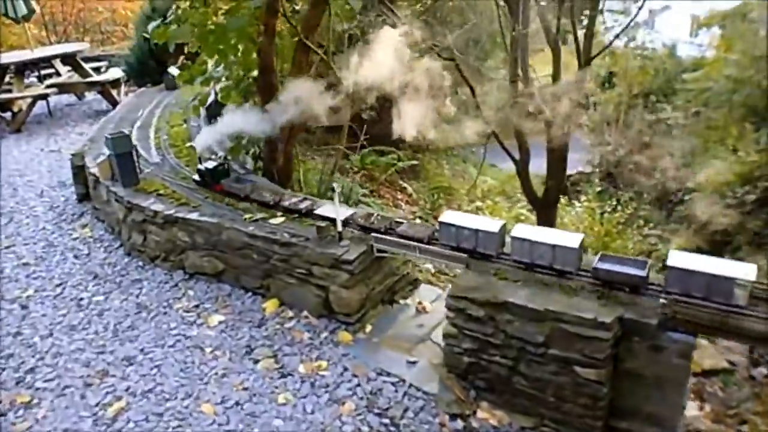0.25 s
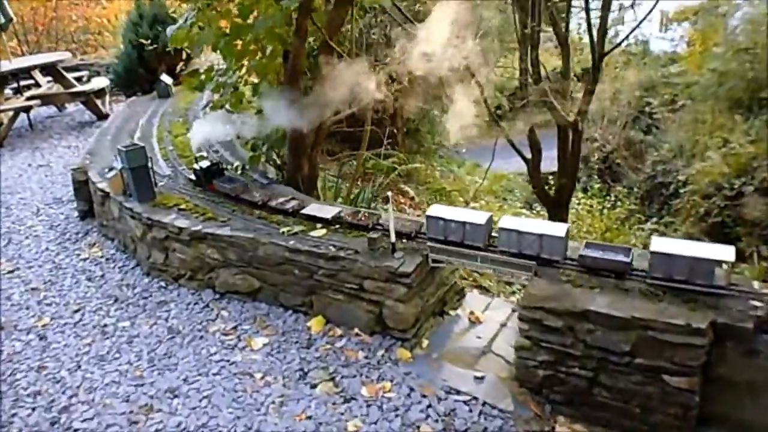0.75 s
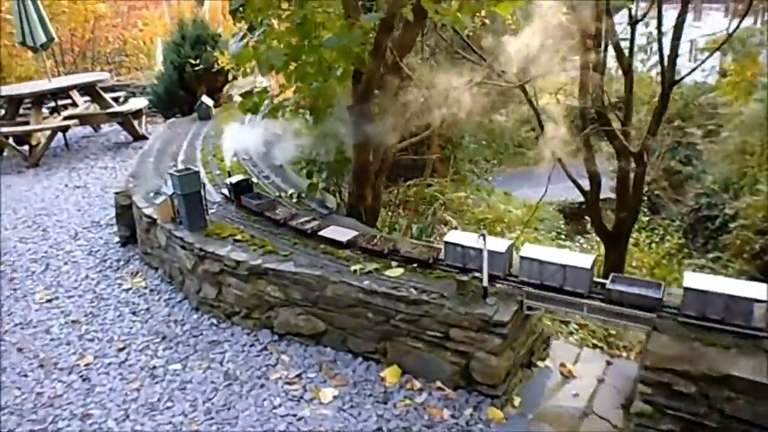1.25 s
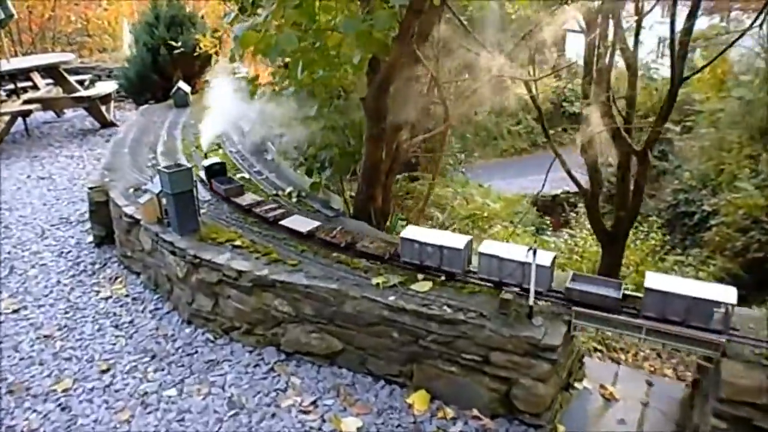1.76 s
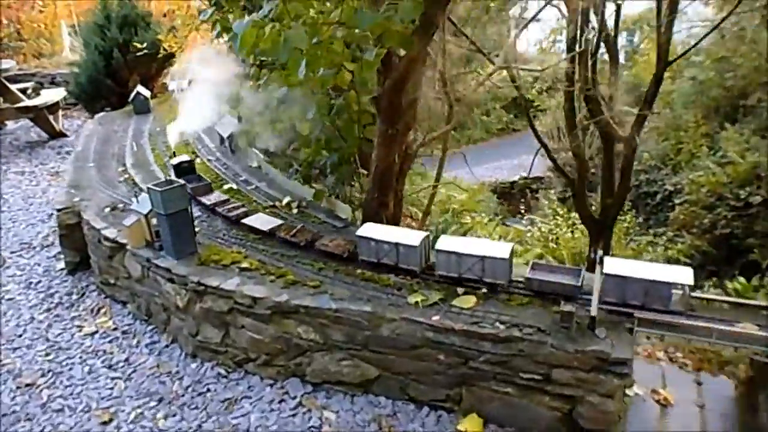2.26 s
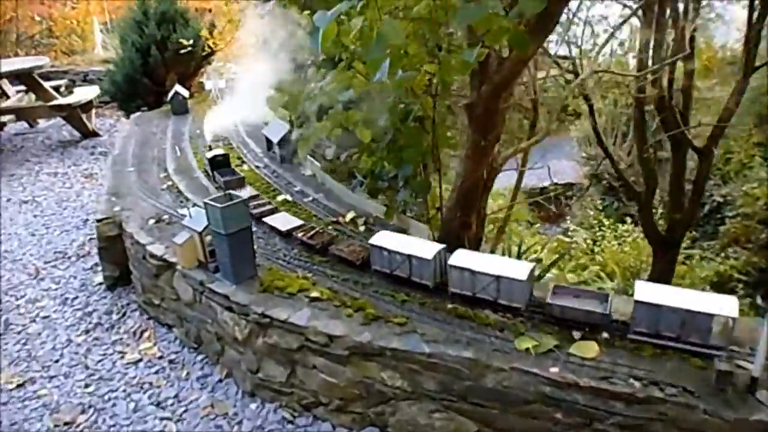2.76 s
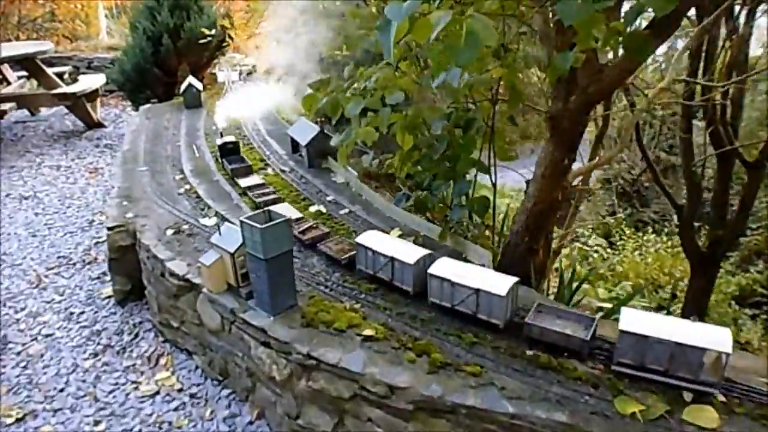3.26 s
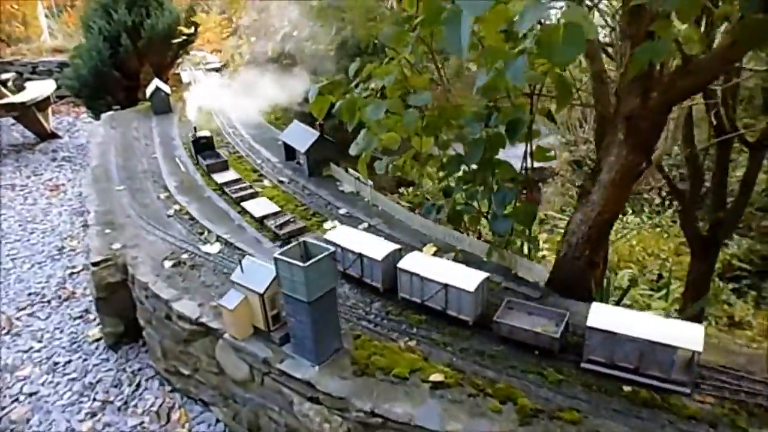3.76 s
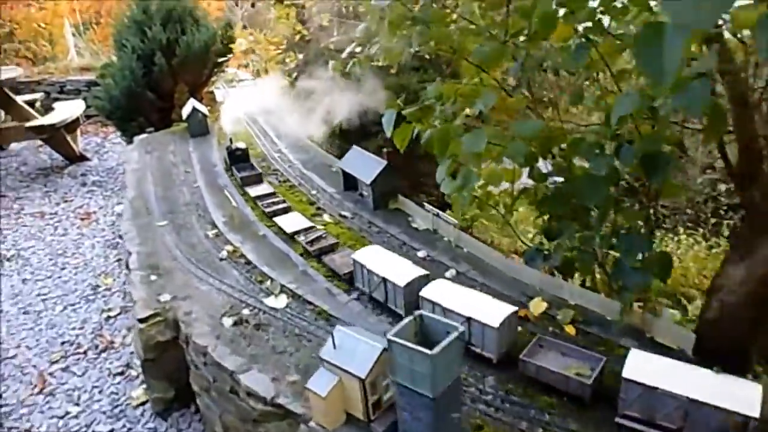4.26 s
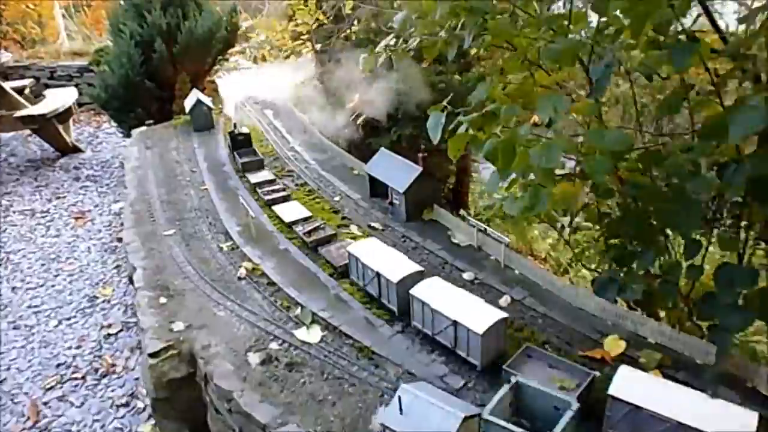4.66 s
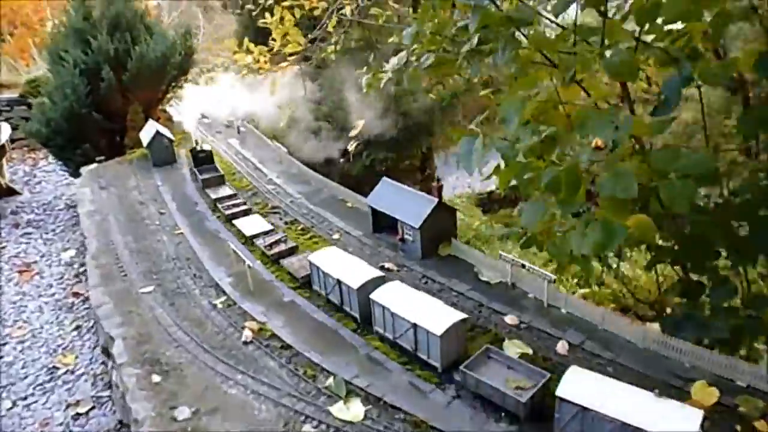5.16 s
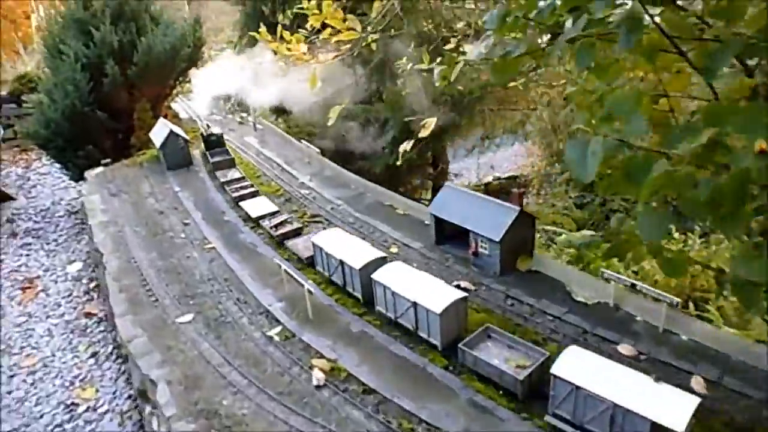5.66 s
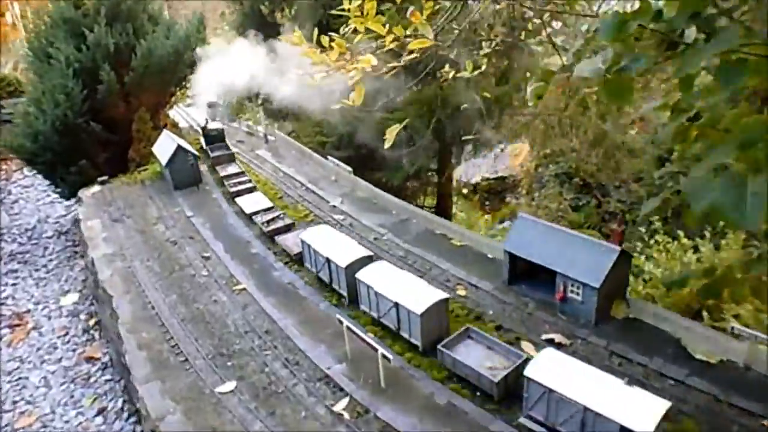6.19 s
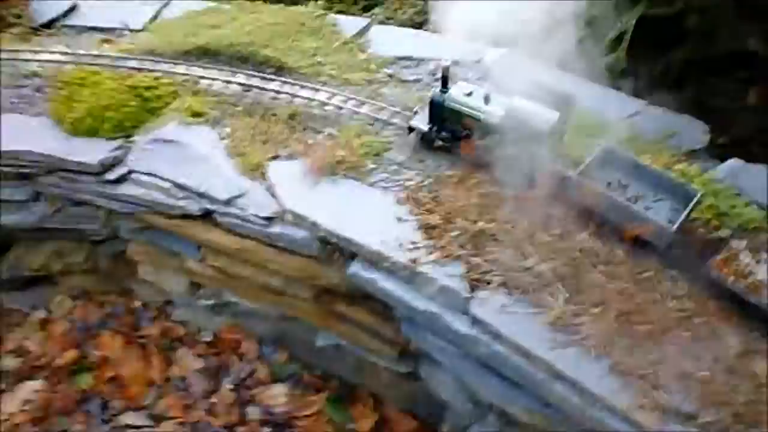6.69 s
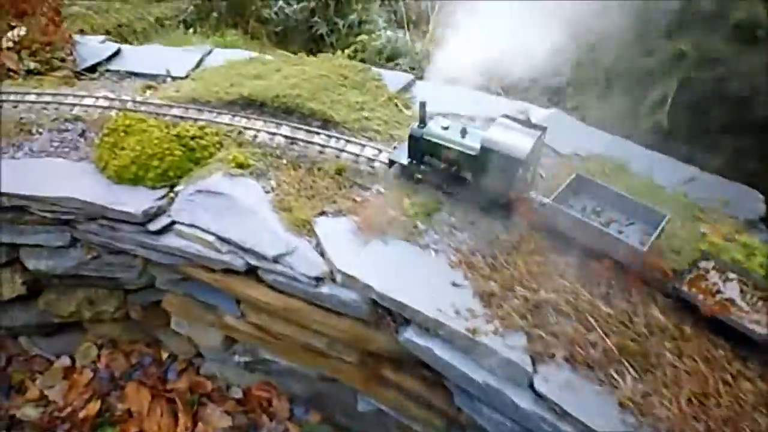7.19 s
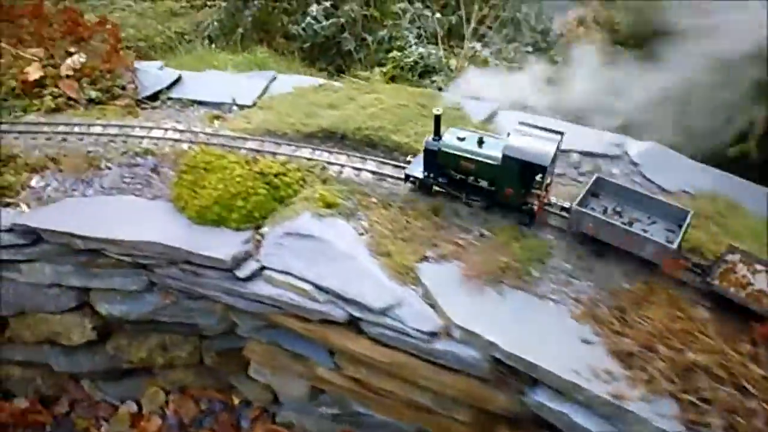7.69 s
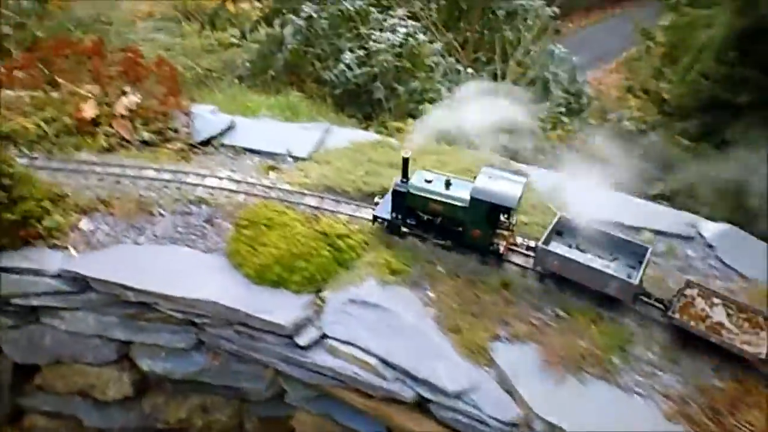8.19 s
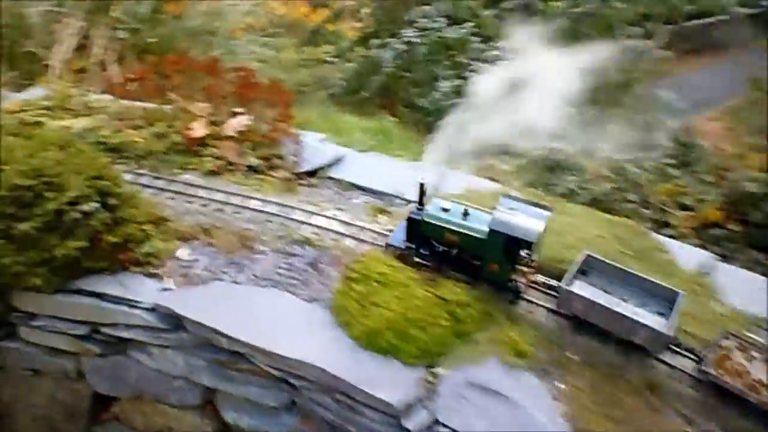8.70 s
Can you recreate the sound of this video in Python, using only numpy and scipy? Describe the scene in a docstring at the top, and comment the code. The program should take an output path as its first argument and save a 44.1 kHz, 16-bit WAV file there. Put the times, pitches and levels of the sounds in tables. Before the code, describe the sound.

Heard from a few metres away in a garden, a small steam engine hisses and sputters with a steady wavering burner tone. Its wagons roll with a gritty rumble and metallic ticks, and loose stones crunch briefly. A run of clacks and thumps over rail joints follows, before the sound jumps close to the engine, softly chuffing with a faint wheel squeal.

```python
"""A gas burner sings over hissing steam and rumbling wheels: a small steam engine is pulling wagons along a
garden wall. The flame makes its flue (the hot tube through the boiler) ring, a jet of gas whistles, and wet
steam spits. Wheels squeal faintly, tick and knock over rail joints; wagons thud and loose stones crunch. The
engine is some metres off at first; then the scene changes to close by the engine, where soft puffs from its
chimney are heard too."""
import sys
import numpy as np
from scipy import signal
from scipy.fft import rfft, irfft, next_fast_len
from scipy.io import wavfile

SR = 44100
rng = np.random.default_rng(int(sys.argv[2]) if len(sys.argv) > 2 else 0)


def materialize(psi):
    """Save the field psi as 16-bit PCM at rate SR to the path in sys.argv[1].

    A 1-D psi becomes a single channel; in a 2-D psi each row is a channel.
    """
    bounded = np.clip(np.atleast_2d(psi).T, -1, 1)
    quanta = np.round(bounded * 32767).astype(np.int16)
    wavfile.write(sys.argv[1], SR, quanta)


N = 394254
T = np.arange(N) / SR
CLOSE_S = 6.712  # here the scene changes: from now on the engine is heard from close by


def undb(db):
    """Turn decibels into a number to multiply a sound by."""
    return 10 ** (np.asarray(db) / 20)


def unit(x):
    """Scale a sound so that its average strength (rms) is 1."""
    return x / np.sqrt(np.mean(x ** 2))


def curves(table):
    """Join a table's points with straight lines: one curve for each column after the time."""
    s, *columns = np.transpose(table)
    return [np.interp(T, s, c) for c in columns]


def wobble(hz):
    """A smooth random wobble of size 1 that changes about hz times a second."""
    smooth = signal.butter(2, hz, fs=SR, output="sos")
    return unit(signal.sosfilt(smooth, rng.standard_normal(N + SR))[SR:])


def colour(x, points):
    """Shape a sound's lows and highs along (f/Hz, level/dB) points, then scale it to strength 1."""
    hz, db = np.transpose(points)
    size = next_fast_len(N)
    f = np.maximum(np.fft.rfftfreq(size, 1 / SR), 1)
    gain = undb(np.interp(np.log(f), np.log(hz), db))
    return unit(irfft(rfft(x, size) * gain, size)[:N])


def resonate(x, hz, width):
    """Let a sound ring around one pitch; a smaller width (Hz) gives a purer ring."""
    return signal.lfilter(*signal.iirpeak(hz, hz / width, fs=SR), x)


def fade(t, t60):
    """Die away by 60 dB in t60 seconds."""
    return np.exp(-np.log(1000) * t / t60)


def grains(per_s, spread_db):
    """Scattered clicks, a few of them much larger than the rest."""
    size = undb(spread_db * np.minimum(rng.exponential(size=N), 4))
    return (rng.random(N) < per_s / SR) * size * rng.choice([-1, 1], N)


def add(out, s, x, db):
    """Mix in a sound at second s, with the energy of 10 ms of steady sound at level db."""
    i = int(s * SR)
    out[i:i + len(x)] += (x * undb(db) / np.sqrt(np.sum(x ** 2) / (SR / 100)))[:N - i]


def flue_tone(hz, width_hz, skirt_hz, steady):
    """Flame noise rings one note of the flue; the flame can only push so hard, which evens it out."""
    flame = rng.standard_normal(N) + 1j * rng.standard_normal(N)
    ring = signal.lfilter([1], [1, -np.exp(-np.pi * width_hz / SR)], flame)
    ring = signal.sosfilt(signal.butter(2, skirt_hz, fs=SR, output="sos"), ring)
    ring = ring / np.std(ring)
    ring = ring / (1 + steady * np.abs(ring) ** 2) ** .5
    return unit(np.real(ring * np.exp(2j * np.pi * np.cumsum(hz) / SR)))  # lift it to the note's pitch


# The burner's two notes, far and close: t/s, low note level/dB, high note level/dB
BURNER_FAR = [(0, -34, -43), (.55, -33, -41), (1.05, -36.5, -37), (1.9, -34.5, -32.5), (2.6, -33.5, -37),
              (3.0, -39.5, -37.5), (4.2, -33.5, -35.5), (4.85, -31.5, -36), (6.7, -42, -41.5)]
BURNER_CLOSE = [(6.73, -25, -32.5), (7.5, -28.5, -36.5), (8.05, -28, -31), (8.65, -27, -40),
                (8.93, -29, -42)]
# The draught through the flue bends the low note: t/s, f/Hz
BURNER_PITCH = [(0, 789), (6.68, 782.9), (6.75, 783.2), (7.35, 816), (8.1, 798), (8.93, 811)]

def burner(close, gap_hz=569):
    """Two breathy flue notes, gap_hz apart, waver together; the flame makes the high one flutter."""
    low_db, high_db = np.where(close, curves(BURNER_CLOSE), curves(BURNER_FAR))
    hz = curves(BURNER_PITCH)[0] * (1 + 0.00635 * wobble(9.85))
    low = flue_tone(hz, width_hz=31.5, skirt_hz=175, steady=0.099)
    high = flue_tone(hz + gap_hz, width_hz=60, skirt_hz=121, steady=.05)
    return low * undb(low_db + 0.55 * wobble(14)) + high * undb(high_db + 1.5 * wobble(32))


def jet_ring(notes, db):
    """A rush of gas or steam rings the engine's high notes."""
    rush = rng.standard_normal(N)
    ring = sum(undb(level) * resonate(resonate(rush, hz, 1.5 * width), hz, 1.5 * width)
               for hz, width, level in notes)
    return undb(db + 2.3 * wobble(12)) * unit(ring)


# Whistling notes of the gas jet and flue, far and close: f/Hz, width/Hz, relative level/dB
JET_NOTES_FAR = [(3085, 220, 2.5), (5240, 250, 0), (5950, 160, 5), (6360, 240, 0.5), (6940, 100, -1)]
JET_NOTES_CLOSE = [(2060, 50, -4), (2730, 490, -7), (2955, 230, -1), (4060, 100, -17.5), (5020, 220, -7.5),
                   (5840, 100, 4), (6360, 150, -1)]
# How loudly the jet whistles: t/s, level/dB
JET_LOUDNESS = [(0, -45), (3, -50.5), (5, -45), (6.68, -52), (6.74, -46), (7.1, -47.5), (7.4, -42.5),
                (8.2, -46.5), (8.93, -45)]

def gas_jet(close):
    """Rushing gas whistles, with one set of notes from afar and another from close by."""
    db, = curves(JET_LOUDNESS)
    return np.where(close, jet_ring(JET_NOTES_CLOSE, db), jet_ring(JET_NOTES_FAR, db))


# The lows and highs of steam: f/Hz, relative level/dB
STEAM_COLOUR = [(100, -23), (1000, 1), (2000, -4), (3300, -2), (4600, -0.5), (5500, -0.5), (6400, -3),
                (7400, 1), (8200, 1.5)]
# How strongly the steam escapes: t/s, relative level/dB
STEAM_LOUDNESS = [(0, -48), (.28, -49.5), (.48, -40), (.85, -47), (1.25, -42), (1.7, -46), (2.3, -44.5),
                  (3.0, -47), (3.5, -39.5), (3.8, -43.5), (4.8, -45.5), (5.5, -41), (6.5, -39), (7.0, -47),
                  (7.5, -43), (8.93, -42)]

def steam():
    """Escaping steam hisses, and the water in it spits in short uneven sputters."""
    hiss = colour(rng.standard_normal(N), STEAM_COLOUR) * undb(-3 + wobble(7.9))
    # each drop of water bursts into a brief shower of crackles
    drops = np.abs(grains(per_s=110, spread_db=1.1))
    showers = signal.fftconvolve(drops, fade(T[:SR // 10], 0.083))[:N]
    crackles = sum(resonate(grains(per_s=1800, spread_db=4.5), hz, 0.55 * hz) * undb(1.2 * wobble(23))
                   for hz in (2100, 3600, 6400))
    spits = undb(1) * colour(crackles * showers, STEAM_COLOUR)
    return undb(curves(STEAM_LOUDNESS)[0]) * (hiss + spits)


# The lows and highs of roaring wheels and of drumming wagons: f/Hz, relative level/dB
ROAR_COLOUR = [(100, -11.5), (250, -12), (400, -2), (560, 1.5), (700, 1.5), (1000, 1), (1300, -0.5),
               (1700, -10), (2500, -14.5), (4000, -19.5), (8000, -43.5)]
DRUM_COLOUR = [(40, -32), (90, -15.5), (150, -3), (230, -0.5), (330, -3.5), (500, -10.5), (1000, -29.5)]
# The roar grows as the wagons come nearer: t/s, level/dB
ROAR_LOUDNESS = [(0, -37), (2.0, -36.5), (3.3, -34.5), (4.4, -35.5), (5.0, -32.5), (6.4, -31.5), (6.8, -36),
                 (8.93, -34)]
# How hard the track shakes the wagons: t/s, level/dB
DRUM_LOUDNESS = [(0, -44), (.5, -37.5), (.9, -47.5), (2.1, -43), (3.8, -41.5), (4.2, -37.5), (5.0, -36.5),
                 (5.6, -39.5), (6.45, -32.5), (6.85, -42), (7.9, -40.5), (8.93, -38.5)]

def rolling():
    """Small wheels roar over gritty rails, and the uneven track drums the wagon bodies."""
    grit = unit(grains(per_s=1500, spread_db=2.0)) + 0.68 * rng.standard_normal(N)
    roar = colour(grit, ROAR_COLOUR) * undb(curves(ROAR_LOUDNESS)[0] + 1.8 * wobble(20))
    drumming = colour(rng.standard_normal(N), DRUM_COLOUR)
    return roar + drumming * undb(curves(DRUM_LOUDNESS)[0] + 2.6 * wobble(3.3))


# The lows and highs of garden air: f/Hz, relative level/dB
AIR_COLOUR = [(15, -2.5), (30, -5), (60, -8.5), (100, -9.5), (200, -9.5), (1000, -33.5)]

def garden_air():
    """The air stirs in a quiet, low rumble."""
    return colour(rng.standard_normal(N), AIR_COLOUR) * undb(-47.5 + 1.6 * wobble(3.8))


# Faint squeals on the curves: start t/s, length/s, starting f/Hz, slide/(Hz per s), level/dB
WHEEL_SQUEALS = [(0, 0.66, 5190, 112, -53), (6.753, 1.05, 2750, -120, -50)]

def squeals():
    """A wheel's guiding lip rubs the outer rail in one wavering tone that swells, slides and dies."""
    out = np.zeros(N)
    for s, length, hz, slide, db in WHEEL_SQUEALS:
        age = np.clip(T - s, 0, length)
        swell = np.abs(np.sin(np.pi * age / length)) ** .5
        tone = np.sin(2 * np.pi * np.cumsum(hz + slide * age + 25 * wobble(60)) / SR)
        out += unit(tone * undb(2.5 * wobble(25))) * swell * undb(db)
    return out


# Sharp metal ticks: t/s, rough peak level/dB, brightest f/Hz
METAL_TICKS = [(0.413, -13, 3660), (0.4524, -18, 6140), (0.4612, -18, 5340), (0.602, -22, 4010),
               (0.609, -10.5, 6340), (0.722, -21, 6180), (1.1992, -19, 2920), (1.289, -18, 7310),
               (1.4588, -17, 7320), (1.503, -18, 3110), (1.8617, -21, 3580), (2.163, -20, 3120),
               (2.4399, -25, 6000), (2.5, -17.5, 4100), (2.7744, -16.5, 1990), (2.848, -21, 3320),
               (3.456, -17, 2030), (3.473, -20, 3070), (3.6664, -13, 7000), (3.838, -19, 2840),
               (3.972, -19, 4300), (3.9926, -18, 2950), (4.2074, -13, 7300), (4.475, -18, 7210),
               (4.538, -18, 3070), (4.668, -15.5, 3200), (4.8636, -14, 2000), (4.938, -15, 6160),
               (5.015, -17, 2050), (5.1206, -9, 7180), (5.214, -12.5, 7500), (5.42, -15, 3130),
               (5.522, -15, 3990), (5.5463, -14.5, 2620), (5.7643, -17, 4410), (6.3037, -10, 3700),
               (6.4855, -12, 6650), (7.034, -22, 3070), (7.33, -10.5, 2230), (7.586, -20.5, 2930),
               (7.611, -17.5, 3000), (7.823, -19.5, 2250), (7.899, -18, 6250), (7.921, -18.5, 5900),
               (8.2627, -18.5, 2260), (8.76, -18, 4150), (8.775, -14.5, 4300), (8.905, -14.5, 6580)]

def ticks(scrape_s=.015, peak_above_average_db=16):
    """As the wagons jostle, wheel lips and couplings scrape briefly, then strike with a dry chatter."""
    out, t = np.zeros(N), T[:SR // 12] - scrape_s
    scrape = .35 * fade(abs(t), .04)
    strike = fade(abs(t), .022) + .2 * fade(abs(t), .1)
    for s, db, hz in METAL_TICKS:
        chatter = rng.standard_normal(len(t)) * np.where(t < 0, scrape, strike)
        tick = resonate(chatter, hz, 1000) + 0.5 * resonate(chatter, 2700, 5900)
        add(out, s - scrape_s, tick, db - peak_above_average_db)
    return out


def clack(hz, t):
    """A wheel lands: a short rattle, a hollow clack and a hard, bright crack."""
    shape = (fade(t, 0.024) + 0.1 * fade(t, 0.17)) * (1 - fade(t, 0.0035))
    blow = rng.standard_normal(len(t)) * shape
    rattle = resonate(resonate(blow, hz, 0.42 * hz), hz, 1.76 * hz)
    hollow = np.sin(2 * np.pi * 0.744 * hz * t) * t ** 2 * fade(t, 0.0063)
    crack = resonate(blow, 2500, 3000)
    return unit(rattle) + 0.55 * unit(hollow) + undb(-15) * unit(crack)


# The notes a wagon's body rings with: f/Hz, relative level/dB, fade time/s
WAGON_NOTES = [(139.7, -9.5, 0.098), (195.7, 2.5, 0.1), (260, -0.5, 0.09), (304, -1.5, 0.079),
               (421.6, 6, 0.064), (560, -9, 0.02)]

def wagon_body(push, t):
    """A push rings the body, a little differently each time; so small a box gives no deep bass."""
    ring = sum(undb(db) * np.cos(2 * np.pi * hz * (1 + 0.061 * rng.standard_normal()) * t) * fade(t, t60)
               for hz, db, t60 in WAGON_NOTES)
    cut_bass = signal.butter(3, 120, "highpass", fs=SR, output="sos")
    return signal.sosfilt(cut_bass, signal.fftconvolve(push, ring)[:len(t)])


# Knocks over rail joints: t/s, clack level/dB, rattle f/Hz, body thump level/dB,
# bounce delay/s, bounce level/dB compared with the first clack
JOINT_KNOCKS = [(0.4133, -31, 1490, -54, .048, -3.5), (2.292, -29, 1680, -40, 0.018, -20),
                (2.777, -19.5, 1380, -26, 0.021, -29), (3.035, -26, 990, -37, 0.028, -7),
                (4.862, -20, 784, -39, 0.022, -21), (5.1232, -17.5, 860, -35, .02, -24),
                (5.849, -23.5, 940, -34, 0.021, -13), (5.8769, -14, 975, -24, .018, -8.5),
                (5.998, -20.5, 880, -24, .02, -18), (6.052, -21, 770, -20, 0.025, 0.5),
                (6.173, -22, 940, -30, .018, -0.5), (6.303, -19, 1180, -20, .023, -5.5),
                (6.414, -22.5, 960, -17.5, 0.023, -15), (6.471, -17.5, 1230, -20, 0.016, -8.5),
                (6.5205, -28, 950, -39, 0.023, -24), (6.617, -17.5, 950, -22, 0.021, -4)]

def knocks():
    """A wheel drops into the gap between two rails, thumps the wagon's body and bounces once."""
    out, t = np.zeros(N), T[:SR // 10]
    for s, db, hz, body_db, bounce_s, bounce_db in JOINT_KNOCKS:
        add(out, s - .001, clack(hz, t), db)
        add(out, s - .001 + bounce_s, clack(hz, t), db + bounce_db)
        push = fade(t, 0.0062) + 0.095 * rng.standard_normal(len(t)) * fade(t, .08)
        add(out, s + 0.00071, wagon_body(push, t), body_db)
    return out


# Deep, dull bumps under the hardest blows: t/s, level/dB, f/Hz
DEEP_BUMPS = [(2.777, -19, 192), (3.995, -36, 163), (5.123, -23, 240), (6.307, -27.5, 187)]

def bumps():
    """A heavy bump dies so fast that it is little more than one low swing."""
    out, t = np.zeros(N), T[:SR // 10]
    for s, db, hz in DEEP_BUMPS:
        add(out, s, np.sin(2 * np.pi * hz * t) * t * fade(t, 0.016), db)
    return out


# Gritty scuffs of small stones: t/s, level/dB
STONE_SCUFFS = [(3.088, -26.5), (4.015, -27), (4.786, -27.5)]

def scuffs(hz=820):
    """Loose stones shift, and their many tiny clicks make a short, dull crunch."""
    out, t = np.zeros(N), T[:SR // 5]
    for s, db in STONE_SCUFFS:
        crunch = grains(per_s=4100, spread_db=6)[:len(t)] * fade(t, .15)
        add(out, s, resonate(resonate(crunch, hz, 450), hz, 700), db)
    return out


# Soft thuds of lurching wagons: t/s, level/dB
LURCH_THUDS = [(3.98, -25), (4.01, -34), (5.83, -22.5), (5.969, -24.5), (6.136, -23.5), (6.254, -16.5),
               (6.308, -18.5), (6.385, -21.5), (6.417, -24), (6.473, -23), (6.565, -22), (6.685, -30)]

def thuds(rise_s=0.0055, muffle_hz=400):
    """A lurch pushes the wagon's body gradually and through a soft contact, so it only thuds."""
    out, t = np.zeros(N), T[:SR // 10]
    for s, db in LURCH_THUDS:
        push = rng.standard_normal(len(t)) * t * np.exp(-t / rise_s)
        soft_push = signal.lfilter(*signal.butter(1, muffle_hz, fs=SR), push)
        add(out, s, wagon_body(soft_push, t), db)
    return out


# Each turn of the close engine's driving wheels: t/s, relative level/dB of its first puff
DRIVING_TURNS = [(6.723, -30.5), (6.996, -28.5), (7.277, -29), (7.545, -33), (7.857, -28.5), (8.094, -28.5),
                 (8.321, -34), (8.562, -34), (8.811, -49.5)]

def chuffs(per_turn=4, weaker_db=-7, half_width_s=0.0049):
    """Soft puffs of used steam ring the chimney and hiss; the first of each wheel turn is strongest."""
    starts, turn_db = np.transpose(DRIVING_TURNS)
    turns = np.arange((len(starts) - 1) * per_turn + 1) / per_turn
    times = np.interp(turns, np.arange(len(starts)), starts)
    levels = np.interp(turns, np.arange(len(starts)), turn_db) + weaker_db * (turns % 1 > 0)
    puffs = sum(undb(db) / (1 + ((T - s) / half_width_s) ** 2) for s, db in zip(times, levels))
    ring = jet_ring(JET_NOTES_CLOSE, db=-5)
    ring += undb(-5.5) * unit(resonate(rng.standard_normal(N), 2970, 450))
    hiss = undb(-8) * colour(rng.standard_normal(N), STEAM_COLOUR)
    return puffs * (ring + hiss)


def scene():
    """Engine, wagons and stones over a low stir of garden air, in one channel."""
    close = T >= CLOSE_S
    whistle = gas_jet(close)
    air = garden_air()
    engine = burner(close) + whistle + chuffs() + steam()
    wagons = rolling() + ticks() + squeals() + knocks() + thuds() + bumps()
    return (engine + wagons + scuffs() + air)[None]


def record(dry, top_hz=7650):
    """The highest treble, above top_hz, is cut away."""
    cut_treble = signal.firwin(161, top_hz, window=("kaiser", 7), fs=SR)
    return signal.fftconvolve(dry, cut_treble[None], mode="same")


dry = scene()
out = record(dry)
materialize(out)
```